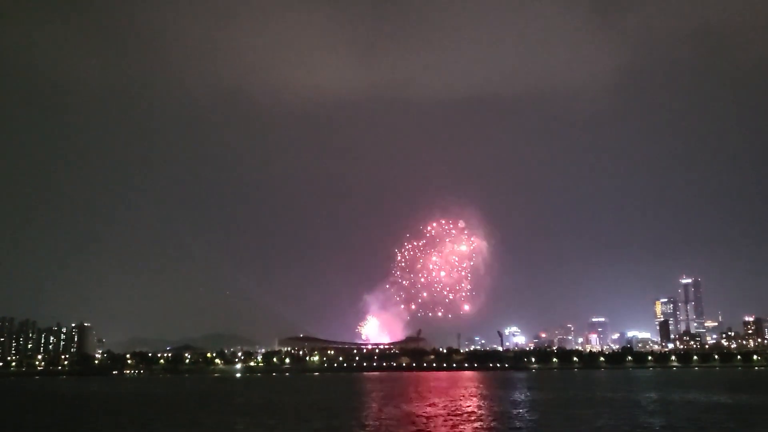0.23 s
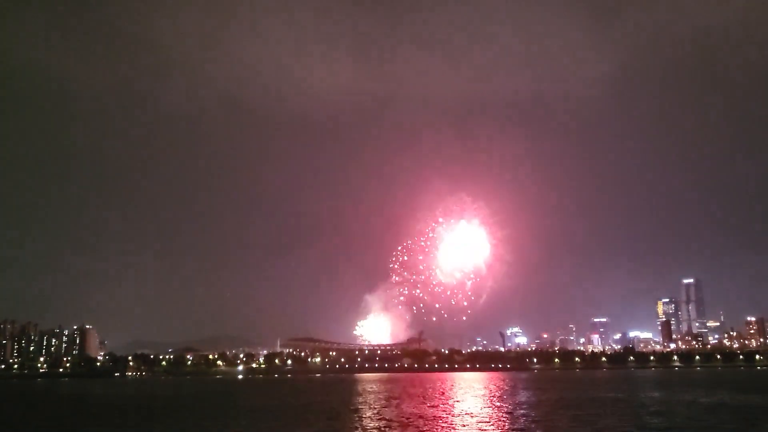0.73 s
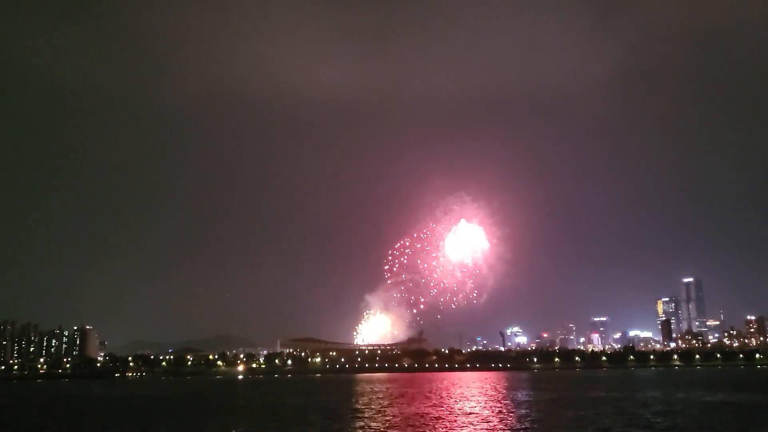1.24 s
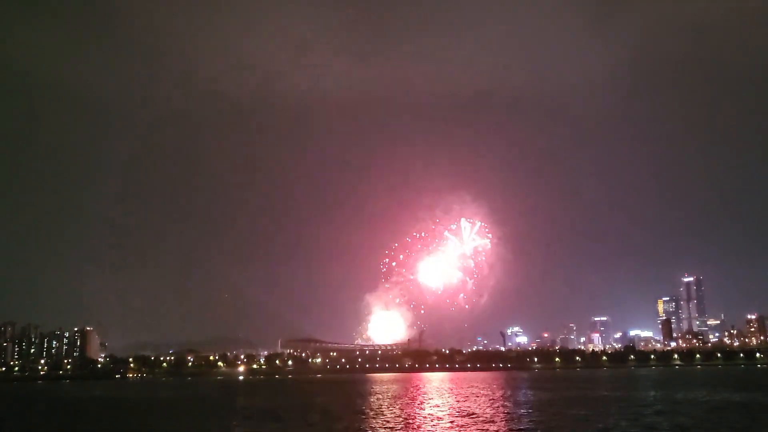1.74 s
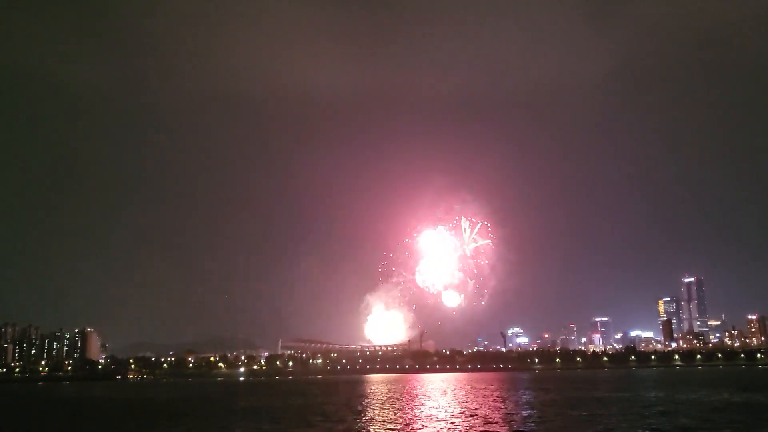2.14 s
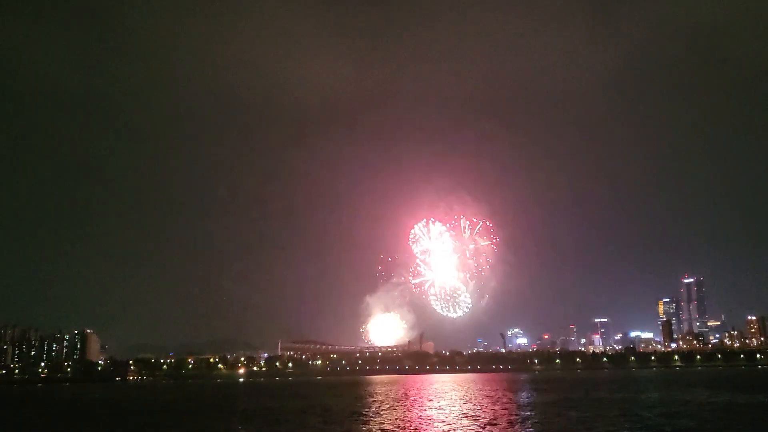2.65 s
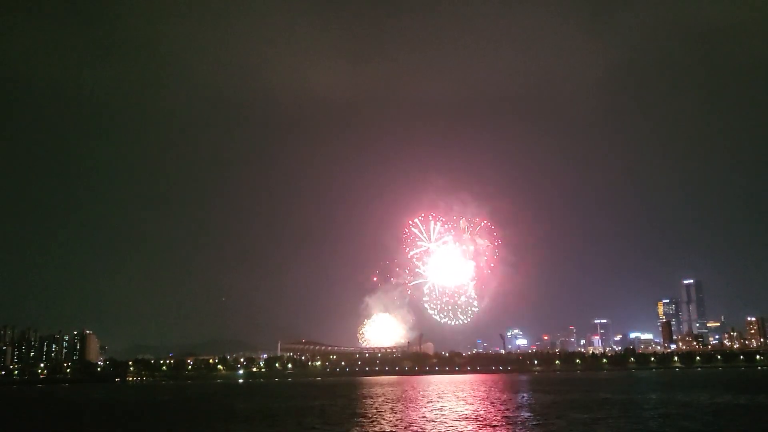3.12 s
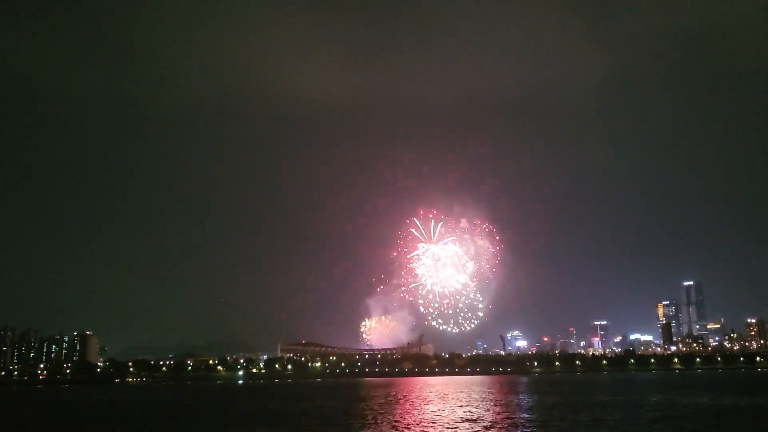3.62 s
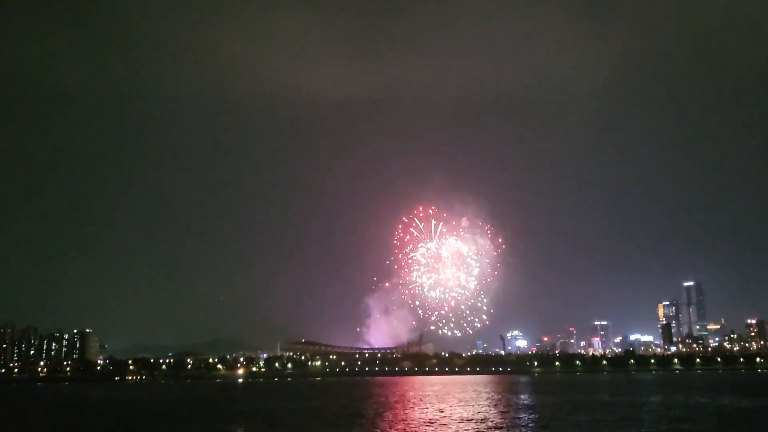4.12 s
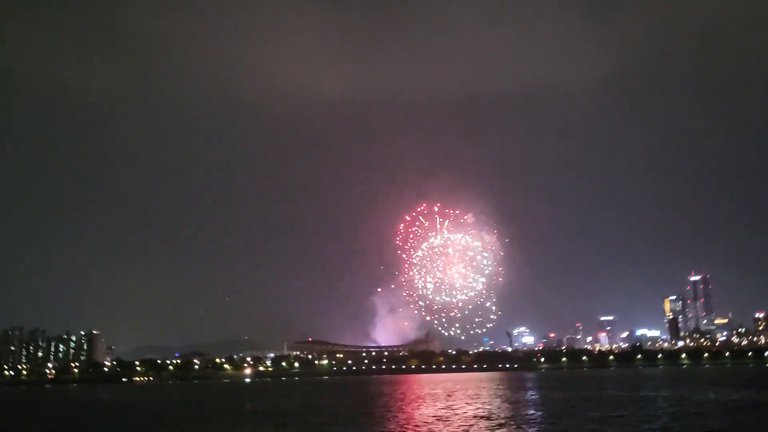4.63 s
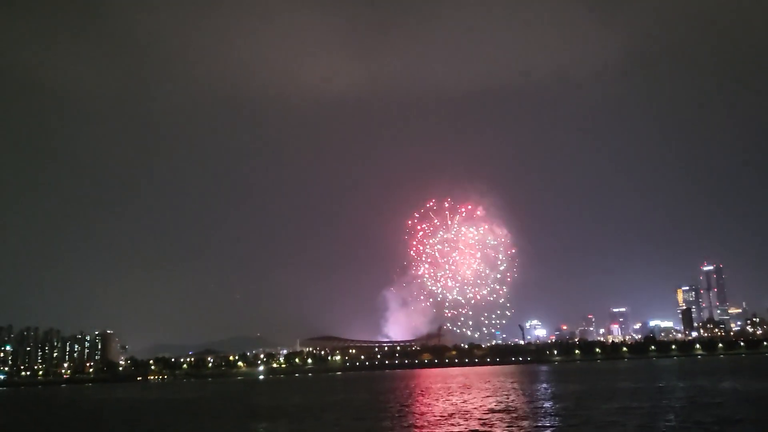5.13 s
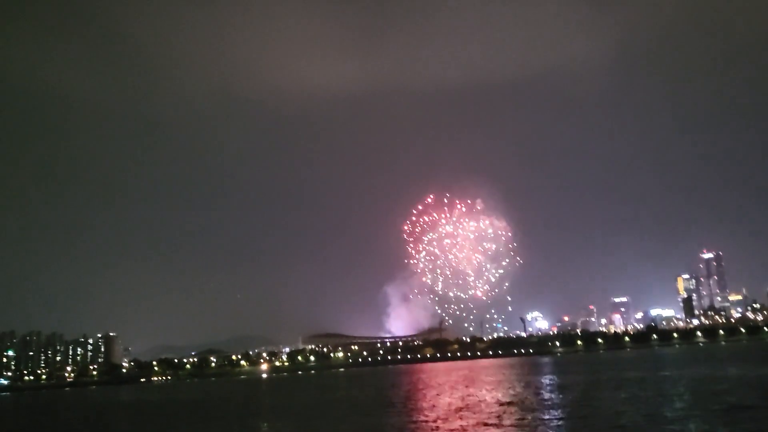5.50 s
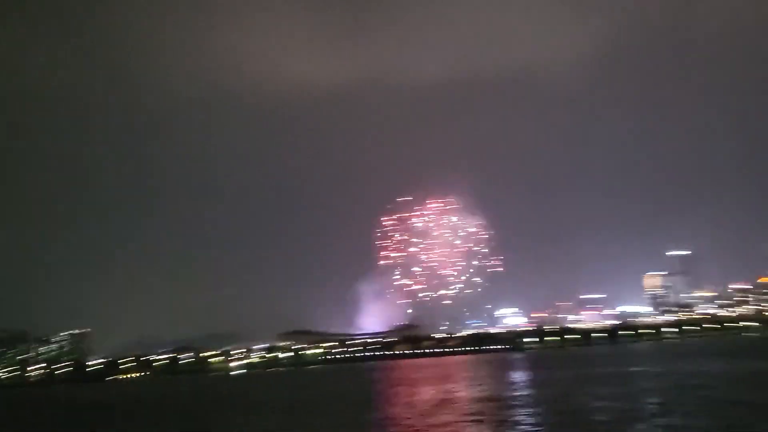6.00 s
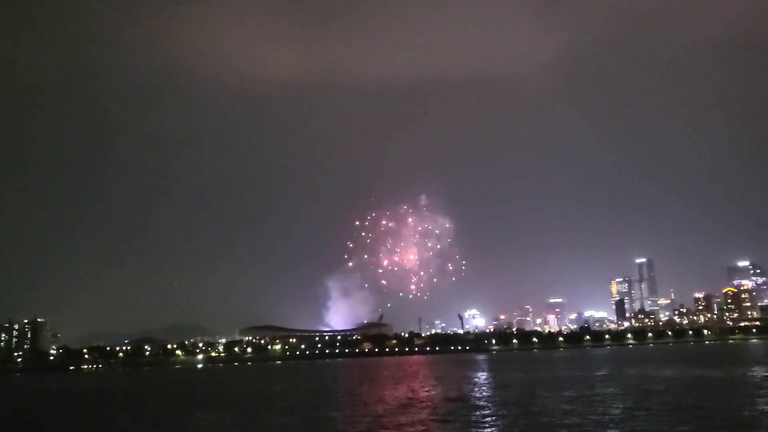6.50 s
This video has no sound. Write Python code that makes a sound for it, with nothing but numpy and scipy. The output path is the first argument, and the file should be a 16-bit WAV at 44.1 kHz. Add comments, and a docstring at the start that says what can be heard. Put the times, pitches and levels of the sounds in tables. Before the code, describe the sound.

Outdoor night fireworks at a distance, over open water. Short knocking pops, dulled by air, come in quick irregular clusters, while larger shells give sharp-edged, bassy thuds. Each bounces off the water, bank and nearby walls, and echoes merge into a rolling rumble. Busy start, sparse middle, dense second half, then heavy final bangs. Small stereo microphones, slightly overloaded on the peaks, pick up faint ticks and treble hiss.

```python
"""Firework shells burst far across a river at night, heard on a small hand-held stereo recorder.
A dense volley opens, thins to scattered bursts, and thickens again from three seconds until heavy blasts end it.
Each blast is an N-shaped pressure wave: first straight, then off the water, with a knock and a low swing,
then off near walls, the river bank and houses. Behind them the town rolls a rumble of banded noise: the middle
bands follow the echo energy, the deepest and brightest their own courses. A faint spitting hiss ticks over it."""
import sys
import numpy as np
from scipy import signal
from scipy.fft import rfft, irfft, next_fast_len
from scipy.io import wavfile
from scipy.ndimage import uniform_filter1d, minimum_filter1d, map_coordinates

SR = 44100
rng = np.random.default_rng(int(sys.argv[2]) if len(sys.argv) > 2 else 0)


def log_audio(samples):
    """Write samples as a 16-bit WAV file to the path given in sys.argv[1]."""
    # one column per channel
    frames = np.atleast_2d(samples).T
    # limit to full scale, then quantise
    limited = np.clip(frames, -1, 1)
    pcm = np.round(limited * 32767).astype(np.int16)
    wavfile.write(sys.argv[1], SR, pcm)


N = 297656

# Blasts, and a few sharp bounces given rows of their own, before the colour of the air:
# start_s, peak_db, length_ms, treble_db
BLASTS = [(0.0001, -5, 1.1, -1.5), (0.0756, -4, 1.0, 7.5), (0.0785, -5.5, 1.5, 3.0), (0.0843, -9, 1.9, -3),
          (0.1104, -9.5, 1.8, 2), (0.138, -6, 1.0, -1.0), (0.2042, -7.5, 1.4, -2), (0.2076, -10, 1, 1),
          (0.2684, -8, 1.3, 1), (0.311, -4.5, 0.9, 0), (0.3689, -5, 1.0, 1), (0.4126, -5.5, 0.84, 1.0),
          (0.4192, -5.5, 0.57, -2), (0.4222, -5, 0.9, -4), (0.4318, -9.5, 0.8, 2.0), (0.4668, -5, 1, 4.0),
          (0.4726, -16, 2.6, 6.5), (0.5341, -12, 1.3, 0), (0.5383, -12.5, 2.5, -5), (0.6161, -1, 2.2, 9),
          (0.888, -16.5, 2.2, 3), (0.9079, -15.5, 1.9, 0.0), (0.913, -18, 2.4, -4), (1.1203, -7, 1.0, 1),
          (1.1697, -11, 1.1, 5.5), (1.4287, -13, 1.6, 5.5), (2.0398, -16, 0.9, -6),
          (2.0407, -17.5, 1.1, 5.5), (2.0495, -15, 2.8, -3), (2.1857, -2.5, 2.3, 10), (2.627, -5, 2.1, 0.5),
          (2.9791, -20.5, 0.8, 1), (2.999, -1.5, 2.1, 6.5), (3.1449, -9.5, 0.82, -0.5),
          (3.1587, -15, 2.6, 1), (3.2964, -9, 0.92, 3), (3.3508, -10, 0.87, -7), (3.484, -6.5, 1, 0),
          (3.529, -11.5, 1, -11), (3.534, -14.5, 2.3, -9), (3.5728, -10.5, 1.4, 6),
          (3.6094, -6.5, 0.8, -2.5), (3.6213, -10, 1.1, -8), (3.7454, -12.5, 1.2, -1),
          (3.8714, -3, 2.35, -1), (3.9483, -12, 1.5, 9), (4.073, -8.5, 1.0, 4.5), (4.1, -12, 1.2, -1),
          (4.1156, -11, 1.3, -5), (4.1964, -9, 0.9, -2), (4.2542, -7.5, 1.0, -2), (4.3725, -8, 1.3, -1.5),
          (4.3877, -7.5, 1.1, -1), (4.4508, -9, 1.2, 1), (4.6292, -9.5, 1.3, -4), (4.6732, -13, 1.1, 3),
          (4.6839, -13.5, 1.2, 2), (4.6947, -8.0, 1.2, -10), (4.826, -13, 1.2, 0.5),
          (4.9359, -14.5, 1.2, -3), (4.9968, -11, 1.2, -4), (5.1214, -2.5, 2.2, 9.5),
          (5.1242, -1.5, 1.1, 13.5), (5.1709, -12, 1.2, -5), (5.2405, -7.0, 1.1, -4),
          (5.2469, -5.5, 1.2, -6), (5.2732, -11.5, 1.2, 1), (5.279, 0, 3, 3), (5.2831, -15, 1.4, 2.5),
          (5.3267, -10.5, 1.2, 3), (5.3569, -10.0, 1.6, 0), (5.3665, -14.5, 2.6, -7),
          (5.386, -14, 1.1, 2.0), (5.4058, -13, 1.3, -10), (5.4219, -15.5, 2.0, -6),
          (5.4635, -10, 1.2, -1.5), (5.5102, -13, 1.2, 0.5), (5.6087, -10.5, 1.2, -3),
          (5.7046, -0.5, 1.3, 5), (5.7468, -10.5, 1.2, 0.5), (5.7758, -10.5, 1.2, -3),
          (5.8676, -9.5, 1.4, -1), (5.9313, -9.5, 1.2, 1), (6.0134, -10.0, 1.1, -6), (6.129, -13, 1.1, 0.5),
          (6.167, -2.5, 2.1, 9), (6.4387, -2.5, 2.1, 5.5), (6.6662, -1.5, 2.2, 7)]
# Colour of the long way through the air: freq_hz, gain_db
AIR_COLOUR = [(200, 3), (700, 5), (1000, 1), (2000, -2), (3200, -13), (3900, -18.5), (5000, -21.5),
              (7000, -33.5), (12000, -58)]
# Low swing after a blast, and its return: pitch_hz, t60_s, start_s, return_delay_s, return_db
LOW_SWING = (99, .039, .005, .0163, -5.5)
# Flat walls near the recorder, for a 1 ms blast: delay_s, level_db
NEAR_WALLS = [(.0071, -20), (.01215, -29), (.0185, -20.5)]
# Bright returns off the river bank: delay_s, level_db
BANK_SLAPS = [(.0645, -15), (.075, -20), (.089, -20)]
# Diffuse returns from waves, river bank and houses behind: delay_s, t60_s, level_db at 1 kHz, tilt_db_per_octave
CLOUDS = [(.001, 0.045, -32, 2), (.019, 0.3, -43, 0.5), (.02, 0.064, -43, 2), (.064, 0.13, -45, 2)]
# Rows boom, roar, rush of the town's rumble: level_db, level_db_per_db of echo energy
TOWN_ROLL = [(-28, 2), (-38.5, 0.7), (-47.5, 2)]
# Noise colours, relative for the steady noise: freq_hz, density_db_per_hz
DEEP_COLOUR = [(20, -53), (35, 8), (52, 15.5), (70, 14), (95, 9), (130, -55.5), (200, -120)]
BOOM_COLOUR = [(70, -38.5), (110, 3), (165, 4), (300, -5), (400, -10.5), (550, -60.5), (800, -120)]
ROAR_COLOUR = [(300, -43), (450, -3.5), (680, -4), (900, -10), (1200, -18.5), (1600, -63.5), (2400, -120)]
RUSH_COLOUR = [(900, -13.5), (1300, 0.5), (2000, -5), (3100, -15.5), (3400, -20), (3800, -31.5),
               (6500, -36), (9000, -50.5), (12000, -120)]
SHEEN_COLOUR = [(2000, -120), (2800, -27.5), (3600, 1.5), (5000, -3.5), (6500, -15.5), (8000, -37),
                (10000, -120)]
# The same for the hiss; it also sets the level of the ticks: freq_hz, density_db_per_hz
FIZZ_COLOUR = [(3000, -14.5), (6000, 2.5), (8500, -4), (11000, -1.5), (14000, -7), (16000, -8)]
# Course of the deepest bass: time_s, level_db
DEEP_COURSE = [(0.0, -20), (0.17, -28), (2.89, -30), (3.25, -24), (4.81, -31), (5.09, -27), (5.28, -28.5),
               (5.43, -31.5), (6.75, -32)]
# Course of the bright wash in the echoes: time_s, level_db
SHEEN_COURSE = [(0.0, -68), (1.0, -64.5), (1.24, -77), (1.5, -78), (2.17, -69.5), (2.22, -59),
                (2.35, -70.5), (2.98, -66), (3.05, -53), (3.12, -64), (3.63, -75), (4.12, -64), (5.1, -71),
                (5.15, -61), (5.3, -56), (5.68, -66), (5.74, -56), (5.83, -74), (6.45, -67), (6.65, -60),
                (6.7, -52), (6.75, -56)]
# Course of the treble hiss: time_s, level_db
HISS_COURSE = [(0.0, -75), (0.3, -70.5), (0.6, -75), (0.95, -66), (1.15, -69), (1.3, -76.5), (2.05, -69),
               (2.5, -74), (2.9, -63.5), (3.15, -73.5), (4.1, -74), (4.4, -70), (5.05, -69.5), (5.3, -74),
               (5.9, -75), (6.05, -70), (6.3, -77.5), (6.6, -67.5), (6.75, -72.5)]
# Faint close ticks, before the fizz colour: start_s, level_db
CLOSE_TICKS = [(0.2838, -37.5), (0.3831, -47), (0.9163, -50.5), (1.095, -41.5), (2.7503, -36),
               (3.8138, -43.5), (3.935, -38.5), (4.3315, -48), (4.4593, -43.5), (5.674, -49), (3.227, -44),
               (6.06, -44), (6.365, -44.5)]
# Likeness of the noise at the two microphone ports: freq_hz, correlation (no unit)
PORT_LIKENESS = [(60, 0.99), (250, 0.94), (500, 0.69), (1000, 0.42), (2000, 0.018), (6000, 0.2),
                 (12000, 0.36)]
# Unequal microphone ports: freq_hz, left_over_right_db, left_lead_rad
PORT_COLOUR = [(40, 4, -.45), (250, 1.5, -.2), (860, 0, .1), (1200, 0, 1), (1550, -.5, 1.9),
               (2600, -1.5, 6.2), (4000, -1, 7.5), (5700, 0, 10.4), (12000, 5, 12)]

# Pressure wave: suction is deepest SLIDE_LENGTHS in; its depth over the peak grows with length up to DEEPEST.
SLIDE_LENGTHS, SUCTION_PER_MS, DEEPEST = 1.2, .46, 1.05
# Return to rest, counted in slides: it falls with the cube of length, within these limits.
RECOVER, QUICKEST, SLOWEST = 1.7, .16, 1.2
# A bigger shell bursts higher: its bounce off the water comes this many blast lengths late.
BOUNCE_LENGTHS, BOUNCE_DB = 1.56, -7.5
EDGE_HZ = 1600  # the front's treble starts here
GLINT_HZ, GLINT_DB, GLINT_GROWS = 3470, -3, 0.73  # extra gain above this: offset, dB per dB of treble
# Part of a 1 ms blast's treble energy that the air smears (less for longer ones), and its decay.
RAGGED_SHARE, RAGGED_T60_S = .5, .02
LONGEST_MS = 2.3  # swing and wall echoes grow with length up to here
THUMP_DB, THUMP_DB_PER_OCTAVE = -23, 20  # swing under the peak of a 1 ms blast, gain per doubling of length
# A 1 ms pop rings at this pitch, longer ones lower; level under the peak, weaker for longer ones.
RING_HZ, RING_SPREAD, RING_T60_S = 430, .35, .03
RING_DB, RING_DB_PER_OCTAVE, RING_SPREAD_DB = -12, -9, 3
# Wall delays (as a fraction) and levels vary; walls return bass, so long blasts best.
WALL_SHIFT, WALL_SPREAD_DB, WALL_HZ, WALL_DB_PER_OCTAVE = .012, 1.5, 750, 11
SLAP_HZ, SLAP_T60_S = 800, .009  # a slap keeps the blast above this, smeared so long
APART_HZ, APART_SHARE = 600, 0.75  # above this the ports hear different scatter; share of that difference
# The town's answer dies and swells so; earlier shells keep up this floor of echo energy.
ECHO_T60_S, ECHO_RISE_S, QUIET_DB = 1.48, 0.0027, 0
SPIT_PER_S, SPIT_DB, SPIT_SPREAD_DB = 160, 11, 3  # small spits: rate, least size over the hiss, spread
BASS_CUT_HZ, TOP_HZ = 41, 15800  # the recorder's band


def bursts():
    """Each row's straight and bounced blast with knock, swing, wall echoes and scatter, summed in stereo."""
    start_s, peak_db, length_ms, treble_db = np.transpose(BLASTS)[:, :, None]
    octaves = np.log2(np.minimum(length_ms, LONGEST_MS))
    t = np.arange(SR // 8) / SR
    direct = blast(1e3 * t, length_ms)
    bounce = amp(BOUNCE_DB) * blast(1e3 * t - BOUNCE_LENGTHS * length_ms, length_ms)
    both = amp(peak_db) * np.array([direct, bounce])
    both = signal.fftconvolve(both, causal(AIR_COLOUR)[None, None], axes=2)[..., :len(t)]

    edge = highpass(both, EDGE_HZ)
    dull = both - edge
    edge = edge + (amp(GLINT_DB + GLINT_GROWS * treble_db) - 1) * highpass(edge, GLINT_HZ)
    # Gusts on the way make some fronts steeper than others.
    straight = dull[0] + amp(treble_db) * edge[0]
    near = dull.sum(axis=0) + amp(treble_db) * ragged(edge.sum(axis=0), length_ms)

    near = near + ring(peak_db, length_ms, t)
    near = near + amp(peak_db + THUMP_DB + THUMP_DB_PER_OCTAVE * octaves) * low_swing(t)
    near = near + amp(WALL_DB_PER_OCTAVE * octaves) * walls(straight)
    near = near + slaps(straight)
    tails = signal.fftconvolve(straight[:, None], scatter(count=len(BLASTS)), axes=2)

    out = np.zeros((2, N + SR))
    for k, start in enumerate(np.round(start_s[:, 0] * SR).astype(int)):
        out[:, start:start + len(t)] += near[k]
        out[:, start:start + tails.shape[2]] += tails[k]
    return out[:, :N]


def blast(ms, length_ms):
    """N-shaped pressure: a jump up, a slide into suction, a return; long blasts suck deeper and snap back."""
    slides = ms / (SLIDE_LENGTHS * length_ms)
    suction = np.minimum(SUCTION_PER_MS * length_ms, DEEPEST)
    recover = np.clip(RECOVER / length_ms ** 3, QUICKEST, SLOWEST)
    fall = 1 - (1 + suction) * slides
    rest = -suction * np.exp(-np.maximum(slides - 1, 0) / recover)
    return np.where(slides < 1, fall, rest) * (slides >= 0)


def ragged(edge, length_ms):
    """Eddies in the air smear each front's treble over a few milliseconds, each in its own colour."""
    t = np.arange(SR // 20) / SR
    share = np.clip(RAGGED_SHARE / length_ms ** 2, 0, 1)
    smear = rng.standard_normal((len(edge), len(t))) * amp(-60 * t / RAGGED_T60_S)
    smear /= np.linalg.norm(smear, axis=1, keepdims=True)
    smeared = signal.fftconvolve(edge, smear, axes=1)[:, :edge.shape[1]]
    return np.sqrt(1 - share) * edge + np.sqrt(share) * smeared


def ring(peak_db, length_ms, t):
    """The short low knock after each pop: a dying sine one period late, in its own pitch and size."""
    pitch, size = rng.standard_normal((len(peak_db), 2)).T[:, :, None]
    hz = RING_HZ / length_ms * np.exp(RING_SPREAD * pitch)
    late = np.maximum(t - 1 / hz, 0)
    ring_db = peak_db + RING_DB + RING_DB_PER_OCTAVE * np.log2(length_ms) + RING_SPREAD_DB * size
    return amp(ring_db - 60 * late / RING_T60_S) * np.sin(2 * np.pi * hz * late)


def low_swing(t):
    """A dying bass sine that starts into suction, and its later return."""
    hz, t60, wait, lag, back_db = LOW_SWING

    def swing(age):
        return -amp(-60 * np.abs(age) / t60) * np.sin(2 * np.pi * hz * age) * (age > 0)

    return swing(t - wait) + amp(back_db) * swing(t - wait - lag)


def walls(straight):
    """Dull copies off flat walls: delay and level vary a little per blast, one shared treble loss."""
    shifts, sizes = rng.standard_normal((len(straight), len(NEAR_WALLS), 2)).T
    padded = 2 * straight.shape[1]
    hz = np.fft.rfftfreq(padded, 1 / SR)
    paths = 0
    for (lag, db), shift, size in zip(NEAR_WALLS, shifts, sizes):
        delay = lag * (1 + WALL_SHIFT * shift)[:, None]
        paths = paths + amp(db + WALL_SPREAD_DB * size)[:, None] * np.exp(-2j * np.pi * hz * delay)
    return irfft(rfft(straight, padded) * paths / (1 + 1j * hz / WALL_HZ))[:, :straight.shape[1]]


def slaps(straight):
    """Bright copies off the river bank, each briefly smeared by a dying burst of noise."""
    t = np.arange(straight.shape[1]) / SR
    grit = rng.standard_normal((len(straight), len(t)))
    paths = sum(amp(db - 60 * np.abs(t - lag) / SLAP_T60_S) * (t >= lag) for lag, db in BANK_SLAPS) * grit
    paths /= np.sqrt(SLAP_T60_S * SR / (2 * np.log(1000)))  # unit energy for a 0 dB slap
    return signal.fftconvolve(highpass(straight, SLAP_HZ), paths, axes=1)[:, :len(t)]


def scatter(count):
    """One stereo tail per blast, made of a few dying clouds of small reflections."""
    hz, t, grains = signal.stft(rng.standard_normal((count, 2, SR // 4)), SR, nperseg=96)
    octaves = np.log2(np.maximum(hz, 200) / 1000)[:, None]
    clouds = sum(amp(db + tilt_db * octaves - 60 * (t - lag) / t60) * (t >= lag)
                 for lag, t60, db, tilt_db in CLOUDS)
    tails = signal.istft(grains * clouds, SR, nperseg=96)[1]
    shared, apart = tails[:, :1], highpass(tails[:, 1:], APART_HZ)
    return shared * [[1], [1]] + APART_SHARE * apart * [[1], [-1]]


def rumble():
    """Far echoes merge into noise bands: three follow the echo energy; all but the deepest share lumps."""
    boom_db, roar_db, rush_db = (db + grows * echoes() for db, grows in TOWN_ROLL)
    lumps = wobble(16)
    deep = amp(curve(DEEP_COURSE) + 1.8 * wobble(3.23)) * noise(DEEP_COLOUR)
    boom = amp(boom_db + 1.1 * lumps + 1.5 * wobble(30)) * noise(BOOM_COLOUR)
    roar = amp(roar_db + 1.3 * lumps + 2.1 * wobble(60)) * noise(ROAR_COLOUR)
    rush = amp(rush_db + 1.5 * lumps + 1.4 * wobble(60)) * noise(RUSH_COLOUR)
    sheen = amp(curve(SHEEN_COURSE) + 1.4 * lumps + 2.7 * wobble(60)) * noise(SHEEN_COLOUR)
    return deep + boom + roar + rush + sheen


def echoes():
    """Energy of all blasts so far that still wanders through the town, in dB around its mean."""
    start_s, peak_db, length_ms, _ = np.transpose(BLASTS)
    step_s = .01
    age = np.maximum(np.arange(0, N / SR + .02, step_s)[:, None] - start_s, 0)
    swell = 1 - np.exp(-age / ECHO_RISE_S)
    power = (amp(2 * peak_db - 120 * age / ECHO_T60_S) * length_ms * swell).sum(axis=1)
    energy_db = 10 * np.log10(power + amp(2 * QUIET_DB))
    return np.interp(np.arange(N) / SR, np.arange(len(age)) * step_s, energy_db - energy_db.mean())


def fizz():
    """A faint flickering treble hiss, with random spits and single ticks as dying snaps of noise."""
    hiss_db = curve(HISS_COURSE)
    flicker_db = 1.6 * wobble(12) + 1.2 * wobble(34) + 1.6 * wobble(370)
    hiss = amp(hiss_db + flicker_db) * noise(FIZZ_COLOUR)
    when, size = rng.random((round(SPIT_PER_S * N / SR), 2)).T
    spit_db = hiss_db[(when * N).astype(int)] + SPIT_DB - SPIT_SPREAD_DB * np.log(1 - size)
    ticks, t = np.zeros((2, N + SR)), np.arange(200) / SR
    for s, db in [*CLOSE_TICKS, *zip(when * N / SR, spit_db)]:
        snap = amp(db - 60 * t / 0.0057) * rng.standard_normal((2, len(t)))
        ticks[:, round(s * SR):][:, :len(t)] += snap
    return hiss + filtered(ticks[:, :N], lambda hz: amp(along(FIZZ_COLOUR, hz)))


def noise(spectrum):
    """Stereo noise of rms 1, as alike as two close ports hear it."""
    def mid_side(hz):
        turn = np.arccos(np.clip(along(PORT_LIKENESS, hz), -1, 1)) / 2
        return amp(along(spectrum, hz)) * [np.cos(turn), np.sin(turn)]

    mid, side = filtered(rng.standard_normal((2, N)), mid_side)
    return unit(np.array([mid + side, mid - side]))


def wobble(rate):
    """A smooth random curve, rate knots a second."""
    return map_coordinates(rng.standard_normal(int(N * rate / SR) + 4), [np.arange(N) * rate / SR])


def curve(rows):
    """One value per sample from (s, value) rows, in straight lines."""
    s, values = np.transpose(rows)
    return np.interp(np.arange(N) / SR, s, values)


def along(points, hz, axis=1):
    """One column of (Hz, value, ..) points on a log axis."""
    table = np.array(points)
    return np.interp(np.log(hz + 1), np.log(table[:, 0] + 1), table[:, axis])


def causal(points, size=2048):
    """Impulse response of (Hz, dB) points that starts at once: minimum phase, by folding the cepstrum."""
    cepstrum = irfft(np.log(amp(along(points, np.fft.rfftfreq(size, 1 / SR)))))
    cepstrum[1:size // 2] *= 2
    cepstrum[size // 2 + 1:] = 0
    return irfft(np.exp(rfft(cepstrum)))[:size // 2]


def filtered(x, response):
    """x times a complex response of frequency."""
    m = next_fast_len(N + SR // 2)
    return irfft(rfft(x, m) * response(np.fft.rfftfreq(m, 1 / SR)), m)[..., :N]


def highpass(x, hz, order=2):
    """Butterworth high-pass along time."""
    return signal.sosfilt(signal.butter(order, hz, "high", fs=SR, output="sos"), x)


def amp(db):
    """Amplitude factor of a level in dB."""
    return 10 ** (np.asarray(db) / 20)


def unit(x):
    """x scaled to rms 1."""
    return x / np.sqrt(np.mean(x ** 2) + 1e-20)


def scene():
    """Blasts, rumble and fizz reach two ports of unequal colour and phase, the left one leading in the treble."""
    def half(hz):
        return amp(along(PORT_COLOUR, hz) / 2) * np.exp(.5j * along(PORT_COLOUR, hz, axis=2))

    return filtered(bursts() + rumble() + fizz(), lambda hz: np.array([half(hz), 1 / half(hz)]))


def record(dry):
    """The recorder: bass cut, a look-ahead limiter at full scale and the band limit."""
    cut = highpass(dry, BASS_CUT_HZ, order=4)
    need = np.minimum(1, 1 / (np.abs(cut).max(axis=0) + 1e-9))
    gain = uniform_filter1d(minimum_filter1d(need, size=61), size=60)
    return filtered(cut * gain, lambda hz: hz < TOP_HZ)


dry = scene()
out = record(dry)
log_audio(out)
```